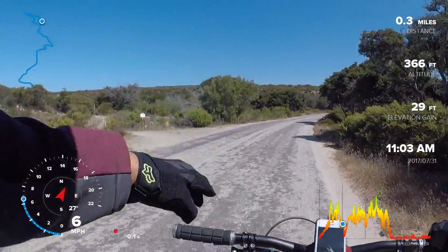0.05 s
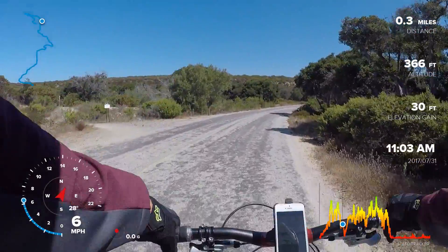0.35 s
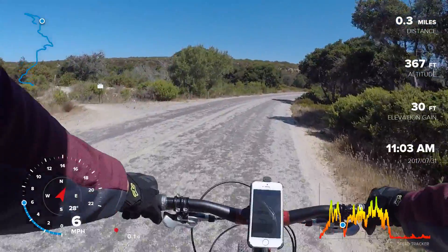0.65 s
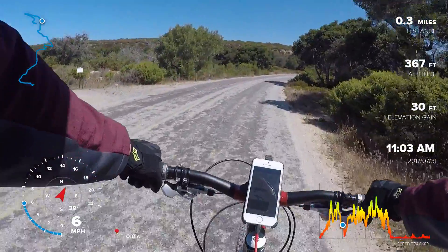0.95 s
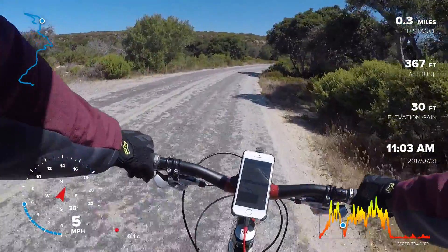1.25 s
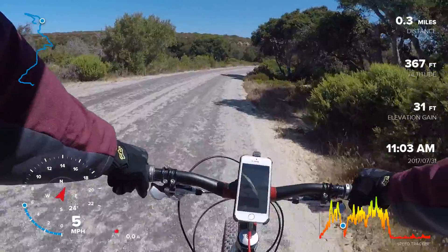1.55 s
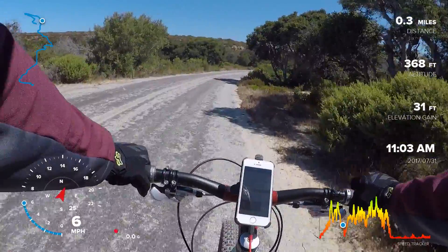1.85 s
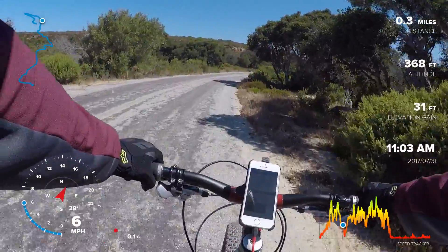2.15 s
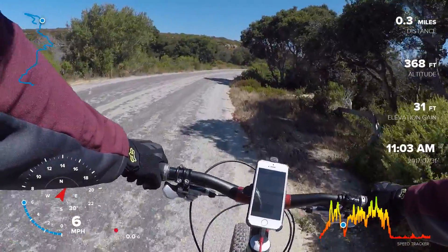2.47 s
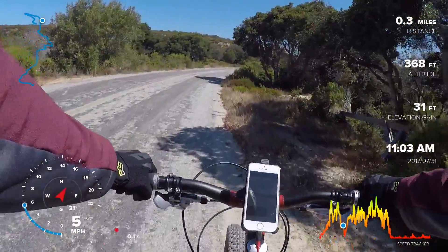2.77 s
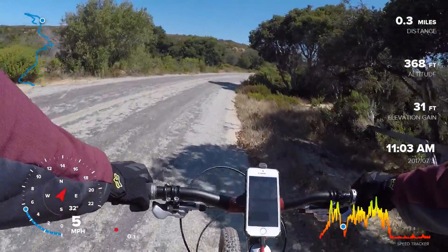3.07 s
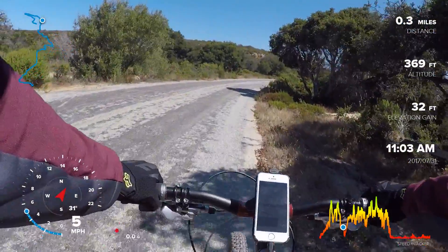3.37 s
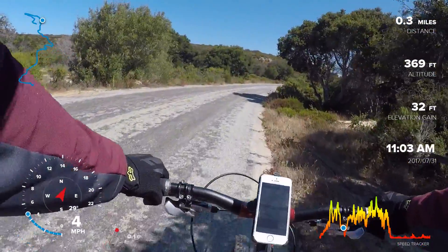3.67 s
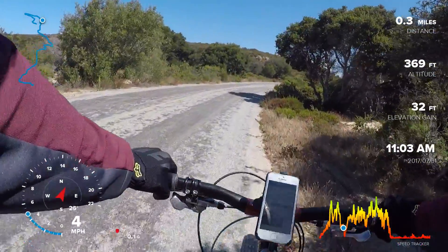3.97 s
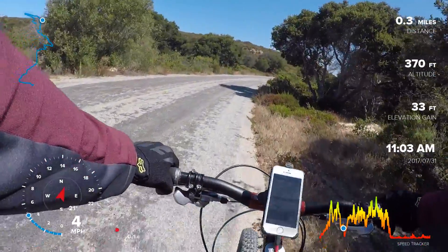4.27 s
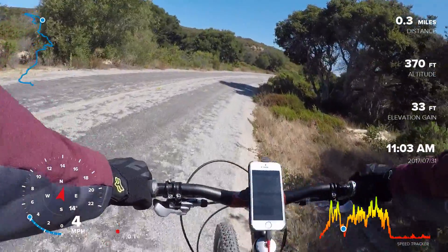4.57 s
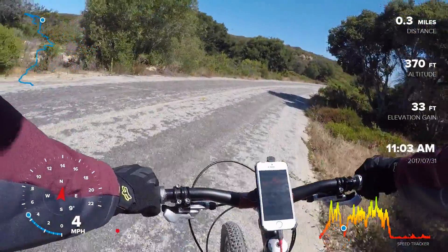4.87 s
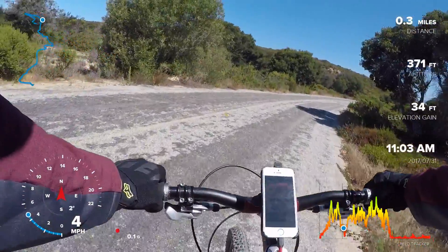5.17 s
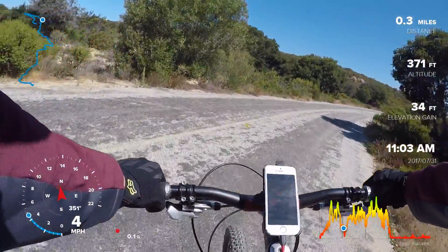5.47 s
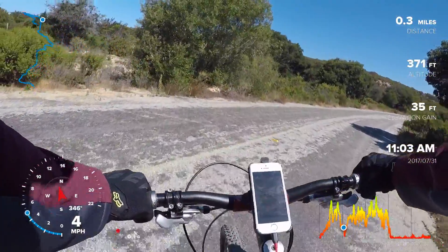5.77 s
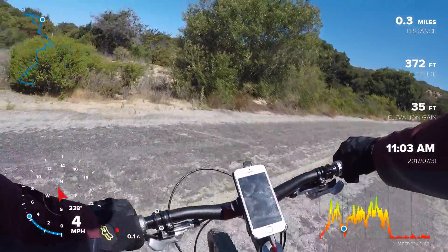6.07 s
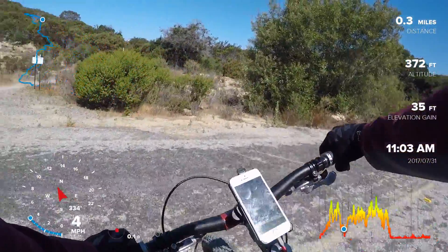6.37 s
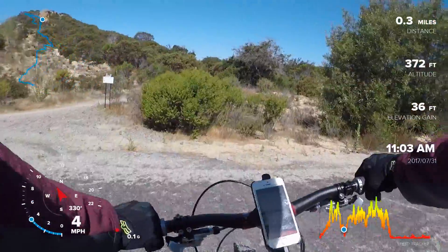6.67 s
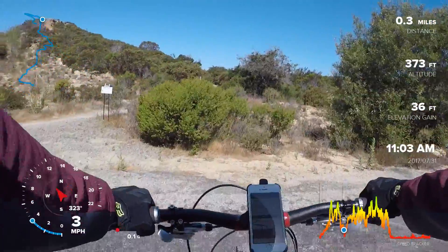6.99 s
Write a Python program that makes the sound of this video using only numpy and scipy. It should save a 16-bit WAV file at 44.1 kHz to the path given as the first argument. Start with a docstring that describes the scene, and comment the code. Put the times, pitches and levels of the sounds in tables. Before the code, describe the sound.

Low gusts of wind hit a microphone worn by a cyclist in the open air. The freewheel ticks in a fast buzz that gradually slows, while the tyres rumble and flick small stones off a gravel road. A disc brake rubs and rings softly, followed by a denser burst of crunching at the road's edge. Near the end come short sandy scuffs and a growing low tyre drone. A faint hum, like a far engine, drifts underneath.

```python
"""A mountain bike coasts along a gravel road, heard from the rider's chest. From the start the freewheel
buzzes, wind buffets the microphone, the tyres rumble, stones tick and loose patches crunch. A faint hum
comes and goes, stepping down in pitch like a far engine. After a second the bike slows, so the buzz
drops and wind and rumble ease. At 2.4 s the brake rubs and its disc rings. At 4.1 s the tyres scrape
along the verge. Two more touches of the brake lead into a turn near 6 s, where the tread drones."""
import sys
import numpy as np
from scipy import signal
from scipy.io import wavfile
from scipy.ndimage import uniform_filter1d

SR = 44100
rng = np.random.default_rng(int(sys.argv[2]) if len(sys.argv) > 2 else 0)


def wrap_up_sound(samples):
    """Save the sound to the file named by the first command line argument, as 16-bit audio."""
    columns = np.atleast_2d(samples).T
    # keep every value between -1 and 1, then stretch to whole-number steps
    tamed = np.clip(columns, -1, 1)
    steps = np.round(tamed * 32767).astype(np.int16)
    wavfile.write(sys.argv[1], SR, steps)


N = 314609
TIME = np.arange(N) / SR


def from_db(db):
    """Turn decibels into a number to multiply a sound by."""
    return 10 ** (np.asarray(db) / 20)


def unit_power(x):
    """Scale a sound to an average power of 1."""
    return x / np.sqrt(np.mean(x ** 2) + 1e-20)


def steady(x, seconds):
    """Hold the power near 1: slow swells go, fast flutter stays."""
    return x / np.sqrt(uniform_filter1d(x * x, max(int(seconds * SR), 2)) + 1e-12)


def curve(points):
    """Join (time, value) points with straight lines."""
    return np.interp(TIME, *np.transpose(points))


def fade(start_s, end_s, rise_s, fall_s):
    """Rise to 1 by start_s, hold until end_s, then fall to 0."""
    return np.clip(np.minimum(1 + (TIME - start_s) / rise_s, 1 - (TIME - end_s) / fall_s), 0, 1)


def swell(middle_s, half_s):
    """A smooth hill of height 1 around a moment."""
    distance = (TIME - middle_s) / half_s
    return np.exp(-distance ** 2) * (np.abs(distance) < 4)


def drift(per_s):
    """A smooth random wobble of about 1, changing about per_s times a second."""
    step, warm_up = 40, 2000
    r = np.exp(-2 * np.pi * step * per_s / SR)
    slow = signal.lfilter([1], [1, -2 * r, r * r], rng.standard_normal(N // step + warm_up + 2))[warm_up:]
    return np.interp(np.arange(N) / step, np.arange(len(slow)), unit_power(slow))


def keep_below(x, hz, order):
    """Remove the highs; a larger order cuts more sharply."""
    return signal.sosfilt(signal.butter(order, hz, fs=SR, output="sos"), x)


def keep_between(x, low_hz, high_hz, order):
    """Keep one band of pitches."""
    return signal.sosfilt(signal.butter(order, [low_hz, high_hz], "band", fs=SR, output="sos"), x + 1e-18)


def resonate(x, rings):
    """Let x ring an object at each (pitch_hz, width_hz, level_db); every other ring is flipped."""
    out = 0
    for k, (hz, width_hz, db) in enumerate(rings):
        r = np.exp(-np.pi * width_hz / SR)
        poles = [1, -2 * r * np.cos(2 * np.pi * hz / SR), r * r]
        ring = (1 - r * r) / 2 * signal.lfilter([1, 0, -1], poles, x + 1e-18)
        out = out + (-1) ** k * from_db(db) * ring
    return out


def noise(tone, source=lambda: rng.standard_normal(N)):
    """Noise of power 1 shaped by (pitch_hz, level_db) points, drawn anew for each third of an octave."""
    hz, db = np.transpose(tone)
    edges = 16 * 2 ** (np.arange(31) / 3)
    out = 0
    for low, high in zip(edges, edges[1:]):
        if high > hz[0] and low < hz[-1]:
            band_db = np.interp(np.log(np.sqrt(low * high)), np.log(hz), db)
            out = out + from_db(band_db) * keep_between(source(), low, high, order=2)
    return unit_power(out)


def narrow_noise(hz, width_hz):
    """A thin band of noise around a moving pitch."""
    slow = keep_below(rng.standard_normal((2, N)), width_hz / 2, order=2)
    phase = 2 * np.pi * np.cumsum(hz) / SR
    return unit_power(slow[0] * np.sin(phase) + slow[1] * np.cos(phase))


def clicks(per_s, spread_db):
    """Clicks at random moments; spread_db makes a few much larger than the rest."""
    sizes = from_db(spread_db * np.minimum(rng.exponential(1, N), 4)) * rng.choice([-1, 1], N)
    return unit_power(sizes * (rng.random(N) < per_s / SR))


# The wheel's speed, counted in freewheel clicks: time_s, clicks_per_s
WHEEL_SPEED = [(0, 114), (1.1, 134), (1.5, 110.5), (2.25, 107), (3.05, 95.5), (4.8, 85.3), (5.1, 81),
               (5.95, 74), (6.2, 71.5), (7.13, 61)]
def speed_db(db_per_doubling, cruise_clicks_per_s=100):
    """How much louder a sound is than at cruising speed."""
    return db_per_doubling * np.log2(curve(WHEEL_SPEED) / cruise_clicks_per_s)


# Stretches of hum: start_s, end_s, pitch_hz, rise_hz_per_s, level_db, fall_db_per_s
HUMS = [(0.413, 0.73, 301, 2, -31.5, 20), (1.4, 1.98, 267, 13.5, -36, 8), (2.268, 3.7, 239.5, 6.5, -36, 4),
        (3.92, 4.58, 174, 2, -40, 3), (3.85, 4.72, 277, 7.5, -47.5, -1),
        (4.701, 5.32, 119.7, 14.5, -32.5, 0), (5.55, 5.88, 135, -3, -33, 0), (4.93, 5.8, 160, 1, -42.5, 2),
        (4.9, 5.8, 211, 0.5, -45.5, 5)]
def far_hum():
    """A low, wavering tone; in most stretches it creeps up in pitch and fades a little."""
    out = np.zeros(N)
    for start, end, hz, rise_hz_per_s, db, fall_db_per_s in HUMS:
        age = np.maximum(TIME - start, 0)
        pitch_hz = (hz + rise_hz_per_s * age) * (1 + 0.003 * drift(10))
        tone = np.sin(2 * np.pi * np.cumsum(pitch_hz) / SR)
        level_db = db - fall_db_per_s * age + 2.1 * drift(8)
        out += fade(start, end, rise_s=0.13, fall_s=0.13) * from_db(level_db) * tone
    return out


# The wind's deep tone: pitch_hz, level_db
WIND_TONE = [(18, -6), (28, 0), (40, -2), (60, -1.5), (85, -6), (120, -9.5), (170, -24), (300, -32.5)]
# Gusts and lulls: middle_s, change_db, half_length_s
GUSTS = [(0.06, 2, 0.1), (0.21, -7, 0.06), (.48, -4, 0.022), (0.66, 3.5, 0.07), (1.635, -3, 0.041),
         (2.197, 3.5, 0.046), (2.361, -8, 0.018), (2.747, 3, 0.03), (2.927, 6.5, 0.027),
         (3.345, -3.5, 0.046), (3.527, 2.5, 0.02), (3.59, -4, 0.028), (4.143, 3.5, 0.053),
         (4.38, 2.5, 0.021), (4.64, -5, 0.17), (4.798, 5.5, .025), (5.335, -10, 0.039), (5.683, 7, 0.055),
         (5.58, 3.5, 0.066), (5.775, -7, 0.029), (6.2, -4.5, 0.13), (6.546, -6.5, 0.031), (7.05, -5, 0.027)]
def wind():
    """Air swirls at the microphone, in gusts, and louder at speed."""
    gusts_db = sum(db * swell(s, half) for s, db, half in GUSTS) + 1.1 * drift(5.5)
    level_db = -25.5 + speed_db(db_per_doubling=9) + gusts_db
    return from_db(level_db) * steady(noise(WIND_TONE), seconds=0.089)


# Jolts from the road: start_s, level_db, pitch_hz
BUMPS = [(.305, -15, 70), (.62, -22, 190), (.685, -24, 215), (1.3, -22, 150), (2.135, -19, 65),
         (3.51, -18, 60), (4.115, -21, 75), (5.9975, -15, 66), (5.991, -27, 150)]
def bumps(rise_s=0.0073):
    """Each jolt briefly swings the microphone's mount, making a thud."""
    out = np.zeros(N)
    for start, db, hz in BUMPS:
        age = np.maximum(TIME - start, 0)
        swing = age / rise_s * np.exp(1 - np.minimum(age / rise_s, 50))
        out += from_db(db) * swing * np.sin(2 * np.pi * hz * age)
    return out


# Loose patches of road: middle_s, half_length_s, crunch_db, grit_db
PATCHES = [(0.385, 0.069, -60, -65), (0.733, 0.07, -59.5, -66.5), (1.02, 0.036, -67, -72),
           (1.327, 0.05, -62, -66), (1.548, 0.078, -55, -62), (1.977, 0.06, -66, -70),
           (2.26, 0.12, -62, -69), (2.597, 0.015, -54.5, -59), (3.237, 0.36, -67, -88),
           (3.825, 0.074, -63, -69), (4.049, 0.036, -62, -74), (4.13, 0.017, -51, -80),
           (4.345, 0.021, -50, -66), (4.79, 0.088, -79, -65)]
# The tones of hissing sand and of crackling grit: pitch_hz, level_db
SAND_TONE = [(900, 1), (1500, 4), (2800, -3.5), (4200, -5.5), (5500, -9.5), (7000, -15.5), (10500, -11),
             (11500, -18.5), (14000, -36), (16000, -36)]
GRIT_TONE = [(2500, 8), (5000, -18), (7500, -0.5), (10000, -13), (14500, -10)]
def grit(firm_road_db=-74):
    """Sand hisses softly and slowly fades; fine grains crackle more on loose patches."""
    hiss = from_db(-58 - 0.3 * TIME) * noise(SAND_TONE)
    wide_clicks = clicks(per_s=200, spread_db=6)  # these sound in every band at once
    crackle = noise(GRIT_TONE, lambda: wide_clicks + clicks(per_s=720, spread_db=5))
    loose = sum(from_db(db) * swell(s, half) for s, half, _, db in PATCHES)
    return hiss + (from_db(firm_road_db) + loose) * crackle


# How crushed gravel rings: pitch_hz, width_hz, level_db
GRAVEL_RINGS = [(683, 46, 8), (792, 44, 7), (1193, 88, -0.5), (1576, 52, 1), (1726, 320, 0),
                (2230, 750, -4.5), (2610, 210, 0.5), (3490, 330, -8), (3860, 180, -3.5), (4500, 670, -7),
                (6000, 1000, -6)]
def gravel(per_s, spread_db, bite):
    """Small stones knock together and ring; the tread's bite runs from 0 (dull) to 1 (bright)."""
    ringing = resonate(clicks(per_s, spread_db), GRAVEL_RINGS)
    bright = unit_power(keep_below(ringing, 6400, order=12))
    dull = signal.sosfiltfilt(signal.butter(6, 4800, fs=SR, output="sos"), bright)
    return dull + bite * (bright - dull)


def road_crunch():
    """The gravel gives way in clumps, louder at speed and on loose patches."""
    crunch = gravel(per_s=2000, spread_db=3.8, bite=0.49)
    firm = from_db(-62 + speed_db(db_per_doubling=7))
    loose = sum(from_db(db) * swell(s, half) for s, half, db, _ in PATCHES)
    clumps = from_db(2.15 * drift(21))
    return (firm + loose) * clumps * crunch


VERGE_START_S = 4.115
def on_verge(end_s=5.3):
    """1 while the tyres scrape the road's edge: quick to start, slower to stop."""
    return fade(VERGE_START_S, end_s, rise_s=0.051, fall_s=0.27)


def verge_crunch(fall_db_per_s=15, bite_s=0.67):
    """The sandy verge gives a much denser crunch, which fades and dulls as the tread bites less."""
    age = np.maximum(TIME - VERGE_START_S, 0)
    crunch = gravel(per_s=7000, spread_db=3.2, bite=np.clip(1 - age / bite_s, 0, 1))
    level_db = -50.5 - fall_db_per_s * age + 2.5 * drift(45)
    return from_db(level_db) * on_verge() * crunch


# How the scraped stones ring: pitch_hz, width_hz, level_db
GRIND_RINGS = [(1630, 380, 0.5), (2900, 450, -4), (3570, 220, 2), (3830, 190, 3), (4570, 500, -6)]
def verge_grind(fall_db_per_s=5.5):
    """Stones on the verge grind in fits, each ring flaring up on its own."""
    ringing = 0
    for ring in GRIND_RINGS:
        flare = from_db(4 * drift(45))
        ringing = ringing + flare * resonate(clicks(per_s=1500, spread_db=3), [ring])
    level_db = -52 - fall_db_per_s * np.maximum(TIME - VERGE_START_S, 0)
    return from_db(level_db) * on_verge(end_s=4.57) * unit_power(ringing)


def sand_slide(middle_s=4.86, fall_hz_per_s=1800):
    """Sand hisses, sinking in pitch, as the tyre leaves the verge."""
    hiss = narrow_noise(4310 - fall_hz_per_s * (TIME - middle_s), width_hz=670)
    return from_db(-64.5) * swell(middle_s, half_s=0.34) * hiss


# The broad hiss of the brake's last touch, then sideways slips of the tyre: start_s, end_s, level_db, top_hz
SCRUBS = [(5.86, 6.09, -57.5, 4600), (6.178, 6.207, -50, 4600), (6.572, 6.63, -51.5, 4200),
          (6.758, 6.78, -50.5, 3020), (7.062, 7.075, -56.5, 2210)]
# The tone of the pushed sand: pitch_hz, level_db
SCRUB_TONE = [(400, 9.5), (750, 6.5), (1250, 1.5), (2300, -2.5), (3000, -6), (5000, -6), (9000, -24)]
def scrubs():
    """The brake's last touch hisses broadly; then in the turn the tyre shoves sand aside in short pushes, each
    with its own brightness."""
    sand = from_db(2 * drift(70)) * noise(SCRUB_TONE)
    out = 0
    for start, end, db, top_hz in SCRUBS:
        push = unit_power(keep_below(sand, top_hz, order=4))
        out = out + from_db(db) * fade(start, end, rise_s=0.03, fall_s=0.06) * push
    return out


# Runs of tread knobs hitting loose grit: start_s, end_s, peak_db
KNOB_RUNS = [(0.355, 0.45, -42), (.706, 0.78, -48), (0.997, 1.056, -42.5), (1.283, 1.368, -43),
             (1.499, 1.591, -41), (1.615, 1.637, -43), (1.993, 2.016, -44), (4.768, 4.852, -45)]
def chips(gap_s=0.0255, ring_s=0.011, knock_db=-1):
    """Knob after knob flicks out one tiny stone; gives rows like those of STONES."""
    rows = []
    for start, end, db in KNOB_RUNS:
        for s in np.linspace(start, end, round((end - start) / gap_s) + 1):
            peak_db = db + 2 * rng.standard_normal()
            pitch_hz = rng.uniform(6200, 9400)
            rows.append((s, peak_db, pitch_hz, ring_s, knock_db))
    return rows


# Larger stones: start_s, peak_db, pitch_hz, ring_s (to fade by 60 dB), knock_db (against the ring)
STONES = [(0.1222, -34, 4780, 0.013, -1), (.2144, -46, 5000, .012, -6), (.3845, -38, 3300, 0.02, -4),
          (.7288, -37, 5400, .02, -2), (0.7795, -35, 4900, .02, -1), (1.0017, -41, 5000, 0.011, 2),
          (1.522, -38, 3400, .016, -4), (1.593, -36, 4600, 0.014, -2), (1.794, -36, 2995, .015, 2),
          (1.807, -40, 4900, .02, -10), (1.917, -42, 4210, .02, -3), (2.014, -37, 5300, 0.02, 4),
          (2.1466, -34.5, 3300, 0.023, 0), (2.181, -39.5, 2700, 0.014, -2), (2.216, -44, 5000, .018, -5),
          (2.2916, -32.5, 3700, 0.029, 1), (2.4337, -38, 3220, .026, -3), (2.594, -40, 4000, .028, -3),
          (2.67, -39.5, 4300, 0.022, -8), (2.78, -37.5, 5360, 0.016, -7), (3.122, -41, 3800, .015, -2),
          (4.044, -39, 4200, .015, -8), (4.1005, -32, 4400, 0.013, -10), (4.1195, -31, 4000, 0.02, 2),
          (4.127, -30, 4400, 0.012, -2), (4.147, -31, 3800, 0.018, 2), (4.215, -38, 3700, 0.022, -6),
          (4.2313, -28, 3200, 0.015, -1), (4.2328, -30, 1730, 0.023, -8), (4.3103, -29.5, 3500, 0.039, -4),
          (4.3284, -31.5, 3550, 0.018, -11), (4.355, -36, 3700, 0.018, -1),
          (4.4126, -36.5, 3500, 0.015, -6), (4.427, -38, 3920, .015, -6), (4.449, -35, 2900, .015, -8),
          (4.5055, -36, 3400, 0.017, -9), (4.523, -33, 3750, 0.034, -10), (4.6365, -34.5, 3500, .018, -6),
          (4.7355, -37, 3060, 0.024, 2), (4.78, -39, 4200, .018, -6), (5.059, -41, 3490, .024, -12),
          (5.3325, -37, 4350, 0.014, -20), (5.3407, -34, 4100, 0.013, -18), (5.3555, -41, 3900, .014, -15),
          (5.4146, -46, 3000, .016, -10), (5.5455, -45, 4800, .016, -8), (5.6929, -45, 4800, .016, -8),
          (6.3945, -47, 5190, .014, -8), (6.4633, -40.5, 4900, 0.027, -6), (6.548, -40.5, 3300, 0.02, -5)]
def stones(rise_s=0.0011):
    """Each stone shoots from under the tread with a short ring, a dry snap and a duller knock."""
    out, age = np.zeros(N), TIME[:SR // 10]
    cushion = 1 - np.exp(-age / rise_s)  # rubber softens the first instant
    for start, db, hz, ring_s, knock_db in STONES + chips():
        crack = 0
        # ring, snap and knock each fill a band set by the stone's pitch
        for low, high, part_db in [(0.78, 1.25, 0), (0.62, 1.45, -2), (0.3, 0.68, knock_db)]:
            burst = rng.standard_normal(len(age)) * from_db(part_db - 60 * age / ring_s)
            crack = crack + keep_between(burst, low * hz, high * hz, order=3)
        tick = from_db(db) * cushion * crack / np.abs(crack).max()
        at = round(start * SR)
        out[at:at + len(age)] += tick[:N - at]
    return out


# How loud the hollow roar is: time_s, level_db
ROAR_LEVEL = [(0, -64), (2.2, -65), (3.1, -53), (3.9, -62.5), (4.3, -53.5), (5.3, -57.5), (6.2, -57.5),
              (7.13, -69)]
# How the hollow tyres ring: pitch_hz, width_hz, level_db
ROAR_RINGS = [(516, 74, -1.5), (655, 60, 1), (781, 81, -1)]
def tyre_roar():
    """Grit under the tread keeps the tyres sounding hollow."""
    hollow = resonate(rng.standard_normal(N), ROAR_RINGS)
    return from_db(curve(ROAR_LEVEL)) * unit_power(keep_below(hollow, 880, order=8))


# How tyres and frame ring: pitch_hz, width_hz, level_db
TYRE_RINGS = [(306.4, 19.2, 3), (429.7, 40, -7), (498, 44, -10), (669, 66, -15), (802, 73, -24)]
# The tone of rolling, before the rubber dulls it: pitch_hz, level_db
ROLLING_TONE = [(90, -4), (140, 4.5), (200, -3.5), (260, -6), (360, -12.5), (500, -19), (780, -23.5),
                (950, -57), (2000, -6.5)]
def tyre_rumble():
    """Knobs and pebbles drum on the tyres, which ring through the frame, louder at speed."""
    ringing = unit_power(resonate(clicks(per_s=1500, spread_db=0), TYRE_RINGS))
    rolling = steady(noise(ROLLING_TONE), seconds=0.22)
    loose = sum(swell(s, half) for s, half, *_ in PATCHES)
    level_db = -37.5 + speed_db(db_per_doubling=6) + 0.5 * loose + 0.2 * on_verge()
    rumble = from_db(level_db) * (from_db(0.8) * rolling + from_db(-6) * ringing)
    return keep_below(rumble, 860, order=8)  # soft rubber lets few highs through


# How loud the tread's drone is: time_s, level_db
DRONE_LEVEL = [(0, -57), (5.8, -58), (6.1, -42.5), (6.45, -38), (6.75, -38.5), (7.13, -31.5)]
# The drone's low notes: pitch_hz, width_hz, level_db
DRONE_RINGS = [(130.5, 25, -4), (167.6, 18, -1.5), (206.5, 23, -1.5), (241, 93, -13)]
def tread_drone():
    """The tread drones as the bike leans into the turn."""
    drone = resonate(rng.standard_normal(N), DRONE_RINGS)
    return from_db(curve(DRONE_LEVEL)) * steady(drone, seconds=0.34)


# Touches of the brake: start_s, end_s, rub_db, ring_db
BRAKE_TOUCHES = [(2.406, 3.558, -57, -59), (5.3, 5.6, -65, -85), (5.85, 5.99, -57.5, -64.5)]
# How the clamp that holds the pads rings: pitch_hz, width_hz, level_db
CLAMP_RINGS = [(805, 45, 2), (1215, 22, -8), (1927, 124, -5.5), (2130, 97, -7), (3260, 1400, -27)]
# A high spot on the disc catches the pads: middle_s, change_db, half_length_s
DISC_CATCHES = [(2.623, 5.5, 0.067), (3.013, 5.5, 0.05), (3.163, 4.5, 0.041), (3.57, 2, 0.047)]
def brake(disc_hz=1640, fall_hz_per_s=28, fall_db_per_s=4):
    """Rubbing pads hiss and ring the disc on one note, which wanders, sinks, and swells at each catch."""
    rub = unit_power(resonate(rng.standard_normal(N), CLAMP_RINGS))
    catch_db = sum(db * swell(s, half) for s, db, half in DISC_CATCHES)
    wander_hz = 10.87 * drift(5.9)
    out = 0
    for start, end, rub_db, ring_db in BRAKE_TOUCHES:
        age = np.maximum(TIME - start, 0)
        pitch_hz = disc_hz - fall_hz_per_s * age + wander_hz
        note = steady(narrow_noise(pitch_hz, width_hz=44), seconds=0.05)
        ringing = from_db(ring_db + catch_db - fall_db_per_s * age) * note
        out = out + fade(start, end, rise_s=0.2, fall_s=0.34) * (from_db(rub_db) * rub + ringing)
    return out


# How loud the freewheel is: time_s, level_db
FREEWHEEL_LEVEL = [(0, -54.5), (.35, -58.5), (.7, -55.5), (.95, -59), (1.15, -61.5), (1.5, -57),
                   (2.25, -61), (2.7, -61), (3.7, -66.5), (4.75, -55.5), (5.2, -60), (5.6, -60.5),
                   (5.95, -63), (6.25, -65), (7.13, -64)]
# How hub and frame ring: pitch_hz, width_hz, level_db
HUB_RINGS = [(670, 30, -2), (795, 55, -2), (1275, 95, 2), (1600, 150, -14), (1975, 55, -3), (2110, 60, -7),
             (2228, 85, 4.7), (2500, 150, -8), (3700, 700, -18), (4450, 700, -19)]
def freewheel(scrape_s=0.001, scrape_db=-9, uneven_db=1):
    """A small latch drops into each passing tooth with a click and a brief scrape, ringing the hub."""
    teeth_per_s = curve(WHEEL_SPEED) * (1 + 0.012 * drift(25))
    teeth_passed = np.floor(np.cumsum(teeth_per_s) / SR)
    drops = np.diff(teeth_passed, prepend=0) * from_db(uneven_db * rng.standard_normal(N))
    tails = signal.lfilter([1], [1, -np.exp(-1 / (scrape_s * SR))], drops + 1e-18)
    scrape = tails * rng.standard_normal(N)
    ringing = resonate(unit_power(drops) + from_db(scrape_db) * unit_power(scrape), HUB_RINGS)
    return from_db(curve(FREEWHEEL_LEVEL)) * steady(ringing, seconds=0.08)


def scene():
    """All the sounds add up in one channel, in the open air, without echo."""
    tyres = tyre_rumble() + tread_drone() + tyre_roar()
    road = grit() + road_crunch()
    verge = verge_crunch() + verge_grind() + sand_slide()
    bike = tyres + road + verge + scrubs() + stones() + bumps() + freewheel() + brake()
    return (bike + wind() + far_hum())[None, :]


def record(dry, notch_hz=704, notch_width_hz=16.4, top_hz=15100):
    """The microphone's case partly swallows one thin band, and the highest treble is cut off."""
    housed = dry - 0.5 * resonate(dry, [(notch_hz, notch_width_hz, 0)])
    return signal.sosfilt(signal.ellip(10, 0.2, 90, top_hz, fs=SR, output="sos"), housed)


dry = scene()
out = record(dry)
wrap_up_sound(out)
```